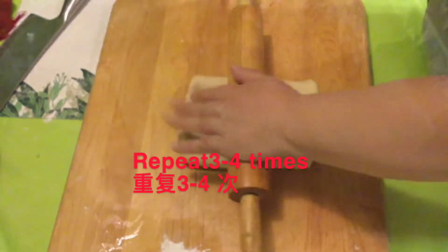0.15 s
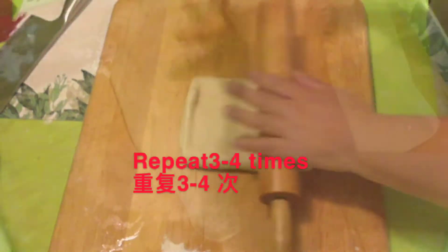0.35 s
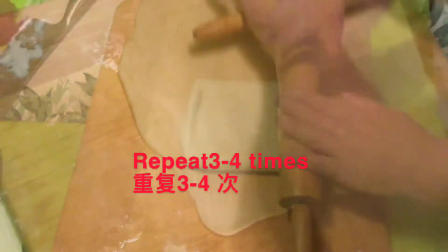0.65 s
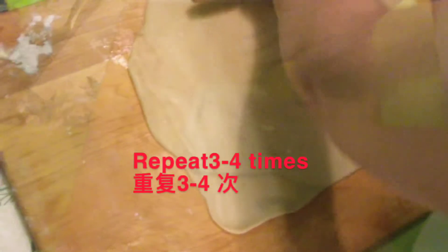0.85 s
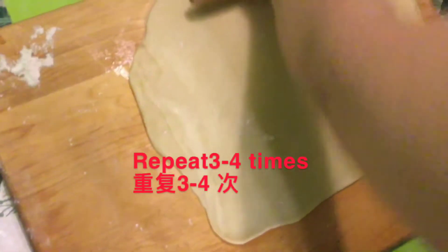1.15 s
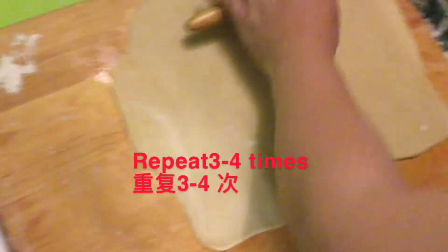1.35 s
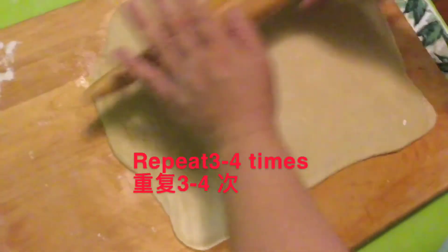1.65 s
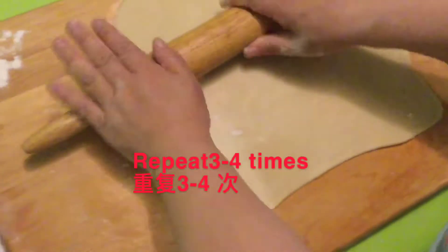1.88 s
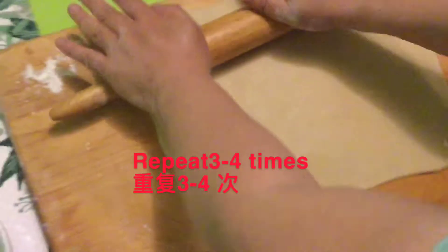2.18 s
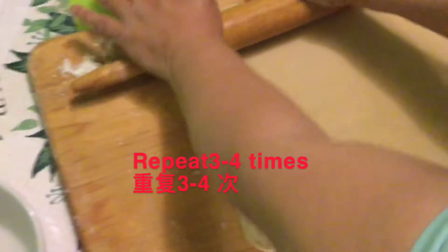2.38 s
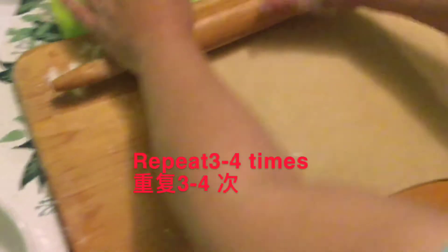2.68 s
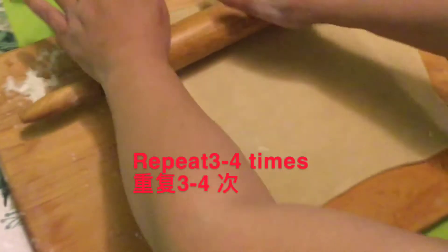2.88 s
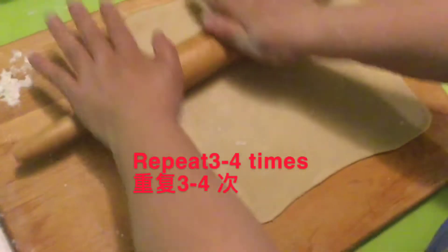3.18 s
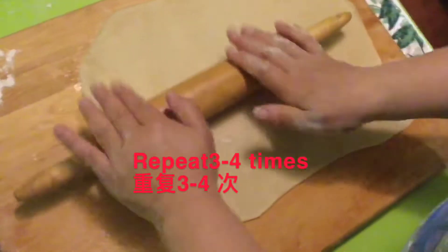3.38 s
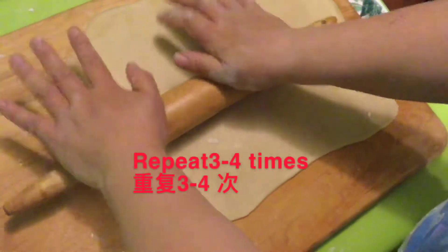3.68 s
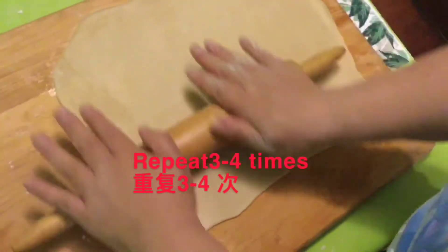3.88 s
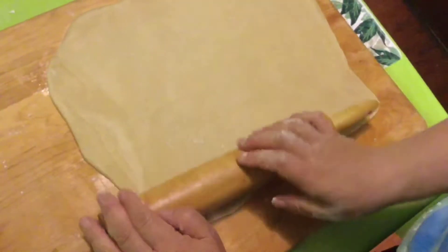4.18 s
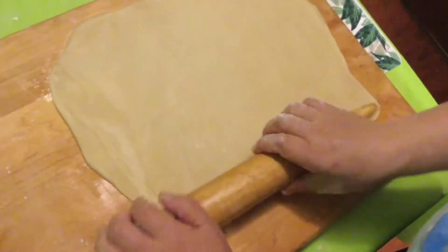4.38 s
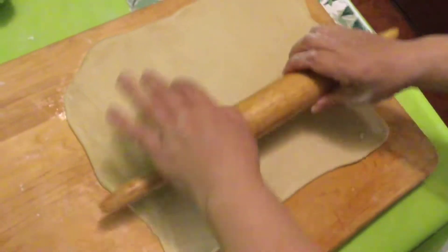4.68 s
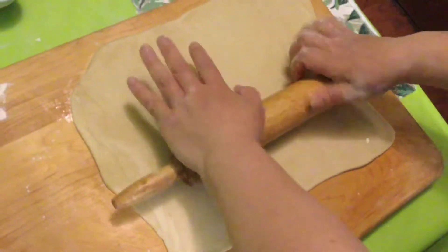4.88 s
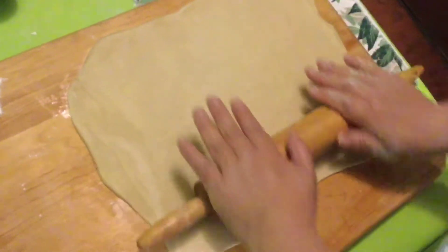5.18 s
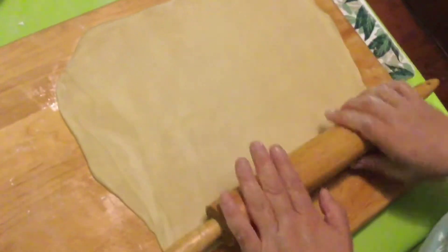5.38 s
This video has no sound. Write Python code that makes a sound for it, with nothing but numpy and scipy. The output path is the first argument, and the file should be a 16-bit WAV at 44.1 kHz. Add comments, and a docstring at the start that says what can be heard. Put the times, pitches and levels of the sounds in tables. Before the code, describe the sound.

Close in a quiet kitchen, a wooden rolling pin works dough on a board. Faint scuffs lead to a sharp ringing clack, then quiet brushing. A heavier clattering cluster with a low thud comes near two seconds, followed by soft rubbing and light taps. Another quick run of bright clacks arrives near five seconds, and a louder palm swish closes it. Small microphone, mono, little deep bass.

```python
"""Quiet kitchen: a wooden rolling pin works a sheet of dough on a wooden board, heard close by.
Knocks and scuffs: noisy contact forces drive the wood's modes; the pin rings near 2, 4 and 5.5 kHz.
Thuds: short sines at board notes. Palms: shaped noise hisses over floured wood and rubs the pin's modes.
Rolling: low noise in the board. Room: faint, mostly low noise."""
import sys
import numpy as np
from scipy import signal
from scipy.fft import rfft, irfft, next_fast_len
from scipy.io import wavfile
from scipy.ndimage import uniform_filter1d, map_coordinates

SR = 44100
rng = np.random.default_rng(int(sys.argv[2]) if len(sys.argv) > 2 else 0)


def store_wav(level_fs):
    """Save 16-bit WAV to argv[1]."""
    pcm = np.round(np.clip(np.atleast_2d(level_fs), -1, 1) * 32767)
    wavfile.write(sys.argv[1], SR, pcm.T.astype(np.int16))


N = 244314  # samples

# Room and microphone noise: (frequency [Hz], relative density [dB per Hz])
ROOM_SPECTRUM = [(15, -37), (25, -13.5), (113, -9.5), (165, -10.5), (205, -14.5), (341, -23), (391, -23),
                 (435, -6.5), (570, -19.5), (1590, -17), (1920, -20.5), (2190, -20.5), (15700, -32)]
# Board under the rolling pin: (frequency [Hz], relative density [dB per Hz])
ROLL_SPECTRUM = [(15, -57), (25, -27), (60, 1), (178, -5.5), (350, -5.5), (395, -7.5), (445, -12.5),
                 (900, -20), (1170, -37.5), (1980, -120)]
# Rolling pin, before its random unevenness: (time [s], level [dB])
ROLL_LEVELS = [(0.0, -71.5), (0.52, -74.5), (0.65, -67.5), (1.0, -72.5), (1.251, -70), (1.73, -71),
               (2.02, -71), (2.42, -70), (3.19, -71.5), (3.32, -69), (3.53, -68.5), (3.72, -70.5),
               (3.92, -69), (4.2, -68), (4.81, -70), (4.94, -65.5), (5.14, -71.5), (5.54, -66.5)]
# Palm on floured wood: (frequency [Hz], relative density [dB per Hz])
PALM_SPECTRUM = [(1500, -59.5), (3300, -11.5), (3950, 0), (5200, -2), (6300, -6.5), (9000, -4), (15700, -4)]
# Hands resting on the turning pin, hiss before roughness: (time [s], level [dB])
REST_HISS_LEVELS = [(0, -83), (.35, -78.5), (.53, -83), (.83, -77.5), (.97, -80.5), (1.13, -76.5),
                    (1.2, -94), (1.6, -77), (1.8, -84), (2.1, -73), (2.52, -75.5), (2.63, -80.5),
                    (2.92, -74), (3, -86), (3.3, -72.5), (3.5, -71), (3.62, -80.5), (4, -70), (4.36, -71),
                    (4.59, -81.5), (5.16, -75), (5.54, -76.5)]
# Palms sliding over the pin, before roughness:
# (time [s], hold [s], hiss level [dB], rubbed pin level [dB])
SLIDES = [(0.203, 0.014, -69.5, -90), (0.287, .02, -71, -90), (0.425, .012, -73.5, -92),
          (1.227, 0.084, -75, -87), (1.412, .012, -73, -82), (1.418, 0.0062, -66, -78),
          (1.488, 0.045, -75, -78), (2.155, 0.029, -67, -78), (2.71, 0.057, -64, -79),
          (3.096, .012, -79.5, -88), (3.247, 0.031, -70.5, -94), (3.507, 0.022, -77.5, -79),
          (3.738, 0.014, -77, -82), (3.892, 0.12, -72, -71), (4.186, 0.017, -76.5, -70),
          (4.29, 0.034, -69.5, -92), (4.408, 0.01, -65, -84), (4.515, 0.013, -73.5, -74.5),
          (4.647, 0.06, -75.5, -84), (5.032, .015, -70, -88), (5.411, 0.069, -54.5, -69)]
# Soft bumps sounding one board note: (time [s], frequency [Hz], level [dB], hold [s])
THUDS = [(1.006, 261.6, -52.5, 0.018), (1.95, 315, -34.5, 0.0082), (3.757, 410, -51, 0.0092)]
# Modes of board and pin, ringing freely: (frequency [Hz], relative level [dB], t60 [s])
WOOD_MODES = [(73, -6, 0.21), (116.7, 4.5, 0.16), (162.3, -2.5, 0.11), (219.3, -2, 0.17), (265, -8.5, 0.12),
              (308.7, 0, 0.073), (390, -12.5, 0.22), (411, -24.5, 0.12), (789, -4, 0.022),
              (1024, -0.5, 0.019), (1346, -2.5, 0.044), (1510, -13, 0.14), (1670, -0.5, 0.034),
              (1840, -2.5, 0.074), (1934, -14.5, 0.63), (1951, 9, 0.065), (2207, -13, 0.23),
              (2410, 2.5, 0.056), (2980, -5.5, 0.071), (3505, -18.5, 0.23), (3916, -5, 0.015),
              (4000, 0.5, 0.033), (4386, -5.5, 0.1), (5140, -12, 0.11), (5487, 2.5, 0.14),
              (6280, -1.5, 0.064), (6990, -1, 0.08), (8500, 3, 0.097), (9000, -18, 0.037)]
# Spread of a contact over the wood: (zone centre [Hz], level against its part's column [dB])
ZONES = [(104, -1.5), (190, -2.1), (391, -1.86), (1080, 0.8), (1988, -1.1), (2450, -1.4), (3110, -4.5),
         (3950, -3.3), (4430, -4.5), (5500, -6.5), (8000, -14.5), (11500, -20)]
# Part driving each zone: (index into the six parts of KNOCKS [0-5])
ZONE_PART = [0, 0, 1, 1, 2, 3, 3, 4, 5, 5, 5, 5]
# Blows of the pin on the board: (time [s], peak levels before zone offsets [dB] of board thump,
# board tap, pin ring, handles, first pin overtones, upper pin overtones;
# share of free ring time the hands allow [0-1])
KNOCKS = [(0.4778, -80, -74, -67, -72, -86, -83, .6),
          (0.5682, -36.5, -44.5, -24.5, -33.5, -29.5, -28, 0.51), (0.6135, -45, -49, -38, -52, -63, -60, 1),
          (0.7567, -70, -66, -41, -63, -59, -57, .4), (0.763, -75, -59.5, -50, -61.5, -66, -59.5, 0.48),
          (1.9164, -66, -46, -42, -54.5, -45, -57, 0.6), (1.9499, -28, -37.5, -68, -64, -44, -46, 1),
          (1.957, -34, -45, -39, -40.5, -29.5, -47, 0.38), (1.9692, -39, -41, -22.5, -42.5, -22, -36, 0.43),
          (1.9834, -33.5, -39, -46, -46, -58, -42, 0.51), (2.007, -48, -50, -48, -63, -70, -63, 0.98),
          (2.0445, -48.5, -58, -49, -74, -73, -69, 0.68), (3.1118, -62, -43.5, -45.5, -64, -59, -66, 0.68),
          (3.124, -61, -44.5, -53, -64, -55, -77, 0.63), (3.918, -75, -48.5, -51, -72, -58, -70.5, 1),
          (4.4012, -57, -44, -47, -46.5, -55, -65, 1), (4.4068, -50.5, -49.5, -33.5, -50, -58, -53.5, 0.21),
          (4.8209, -35.5, -49.5, -31, -31.5, -58, -39, 0.87),
          (4.8306, -52.5, -50, -24.5, -34.5, -41, -44.5, 0.85), (4.892, -62, -62, -47, -69, -53, -50.5, 1),
          (4.92, -48, -61, -40, -46, -44, -44, 0.24), (4.9335, -72, -47, -28, -33, -36.5, -40.5, 0.63),
          (4.9429, -52, -47, -25.5, -60, -53, -37.5, 0.58), (4.9559, -51, -42.5, -30, -68, -61, -70, 0.85),
          (5.014, -59, -57.5, -51, -79, -74, -71, 0.46)]
# Soft scuffs of pin and hands on dough and board: (time [s], peak levels before zone offsets [dB] of
# board thump, board tap, pin ring, handles, first pin overtones; share of free ring time [0-1])
SCUFFS = [(0.2116, -60, -59, -48, -64, -78, 0.09), (0.2339, -75, -65, -56, -72, -81, 0.2),
          (0.4223, -93, -66, -69, -87, -87, 0.59), (0.8949, -93, -67, -64, -66, -64.5, .55),
          (0.925, -95, -62.5, -66, -69, -66, 0.74), (1.004, -77, -59, -75, -76, -72, .5),
          (1.281, -76, -93, -65.5, -76, -64, 1), (1.3104, -69, -95, -74, -79, -67, 0.62),
          (1.4029, -50, -68.5, -59, -80, -57, .71), (1.4293, -52.5, -77, -83, -78, -73, .31),
          (1.518, -77, -63, -86, -68, -73, 0.62), (1.888, -68, -62, -64, -72, -60, 0.34),
          (2.1336, -52.5, -68, -71, -80, -83, 0.16), (2.6388, -74, -68.5, -94, -95, -69, 0.65),
          (2.7719, -69, -83, -65.5, -91, -55, .61), (2.9116, -70, -57, -64.5, -67.5, -67, 1),
          (2.9385, -81, -58.5, -66, -75, -75, 0.67), (3.0847, -61, -67, -67, -72, -58, 0.58),
          (3.1612, -58.5, -57, -71, -85, -83, 0.41), (3.7204, -61, -72, -87, -76, -69, 0.98),
          (3.9293, -71, -58.5, -64, -77, -76, 0.96), (4.271, -70, -71, -63.5, -76, -83, 0.91)]

ROOM_DB = -74
SLIDE_RISE_DB_PER_S, SLIDE_FALL_DB_PER_S = 344, 218
REST_RUB_DB = -8  # resting hands: rubbed pin against hiss
# flour crushed by a blow: level = offset + slope * upper overtone level
PUFF_OFFSET_DB, PUFF_SLOPE_DB_PER_DB, PUFF_T60_S = -38, 0.56, 0.28
# rubbed pin tilt: (frequency [Hz], gain [dB])
RUB_TILT = [(1200, -45.0), (1900, -10.5), (3000, -12.0), (4100, -3.5), (5500, -10.5), (9000, -30)]
THUD_RISE_S, THUD_T60_S = 0.0011, 0.059
KNOCK_CONTACT_S, SCUFF_CONTACT_S = 0.0015, 0.0088  # landing to peak of the mean push
SCUFF_UPPER_DB = -3.5  # upper overtones against first
GRAZE_DB, GRAZE_S = -24.5, 0.0043
WALLS_DB, WALLS_T60_S, WALLS_RISE_S = -9.5, 0.27, 0.003
CRACK_DB, CRACK_CORNER_HZ = -50.5, 1500
BASS_HZ, TOP_HZ = 45, 15800


def amp(db):
    """dB to amplitude ratio."""
    return 10 ** (np.asarray(db) / 20)


def unit(x):
    """x scaled to rms 1."""
    return x / np.sqrt(np.mean(x ** 2) + 1e-20)


def along(points, hz):
    """Interpolate (frequency [Hz], value) points on a log frequency axis."""
    point_hz, value = np.transpose(points)
    return np.interp(np.log(hz + 1), np.log(point_hz + 1), value)


def wobble(knots_per_s):
    """Smooth random curve through normal knots."""
    knots = rng.standard_normal(int(N * knots_per_s / SR) + 4)
    return map_coordinates(knots, [np.arange(N) * knots_per_s / SR])


def filtered(x, response):
    """Apply a complex response of frequency to x."""
    m = next_fast_len(N + SR // 2)
    hz = np.fft.rfftfreq(m, 1 / SR)
    return irfft(rfft(x, m) * response(hz), m)[..., :N]


def rush(spectrum, patchy_db):
    """Noise of rms 1: random gain patches in time and frequency, then spectral shaping."""
    z = signal.stft(rng.standard_normal(N + 512), nperseg=512)[2]
    patches = uniform_filter1d(rng.standard_normal(z.shape), size=6, axis=0)
    patches = uniform_filter1d(patches, size=10, axis=1)
    x = signal.istft(z * amp(patchy_db * unit(patches)), nperseg=512)[1][:N]
    return unit(filtered(x, lambda hz: amp(along(spectrum, hz))))


def modes(hz, free=1, scatter_db=0):
    """Causal resonances of the wood; hands scale every ring time by the share free."""
    mode_hz, db, t60_s = np.transpose(WOOD_MODES)[:, :, None]
    width_hz = np.log(1000) / (np.pi * t60_s * free)
    size = amp(db + scatter_db * rng.standard_normal(mode_hz.shape))
    resonances = size * 1j * hz / (mode_hz ** 2 - hz ** 2 + 1j * hz * width_hz)
    return np.sum(resonances, axis=0)


def room():
    """Steady room and microphone noise."""
    return amp(ROOM_DB) * rush(ROOM_SPECTRUM, patchy_db=1.25)


def rolling():
    """The rolling pin shakes the board: low noise of uneven level."""
    level_db = np.interp(np.arange(N) / SR, *np.transpose(ROLL_LEVELS))
    return amp(level_db - 0.04 + 2.55 * wobble(18)) * rush(ROLL_SPECTRUM, patchy_db=3.5)


def hand_gains():
    """Hiss and rub gains: resting hands and slides add in power; each blow puffs flour into the hiss."""
    now = np.arange(N) / SR
    hiss = amp(np.interp(now, *np.transpose(REST_HISS_LEVELS)))
    rub = hiss * amp(REST_RUB_DB)
    for s, hold_s, hiss_db, rub_db in SLIDES:
        rise_db = -SLIDE_RISE_DB_PER_S * np.maximum(s - now, 0)
        fall_db = -SLIDE_FALL_DB_PER_S * np.maximum(now - s - hold_s, 0)
        shape = amp(rise_db + fall_db)
        hiss = np.hypot(hiss, amp(hiss_db) * shape)
        rub = np.hypot(rub, amp(rub_db) * shape)
    for s, *_, upper_db, _free in KNOCKS:
        puff_db = PUFF_SLOPE_DB_PER_DB * upper_db + PUFF_OFFSET_DB
        decay_db = -60 * np.abs(now - s) / PUFF_T60_S
        hiss = np.hypot(hiss, amp(puff_db + decay_db) * (now >= s))
    return hiss, rub


def palm_hiss(gain, grip_db):
    """Skin slides over floured wood: bright noise, roughened by grip and single grains."""
    grains_db = 0.76 * wobble(300)
    return gain * amp(2.0 + grip_db + grains_db) * rush(PALM_SPECTRUM, patchy_db=2.8)


def pin_rub(gain, grip_db):
    """Gritty rubbing excites the pin's modes, heavily damped by the hands."""
    grit = rng.standard_normal(N) * amp(1.5 * wobble(82))
    rubbed = filtered(grit, lambda hz: modes(hz, free=0.12) * amp(along(RUB_TILT, hz)))
    return gain * amp(grip_db) * unit(rubbed)


def palms():
    """Hiss and rub share one grip as the skin sticks and slips."""
    hiss_gain, rub_gain = hand_gains()
    grip_db = 0.8 * wobble(40)
    return palm_hiss(hiss_gain, grip_db) + pin_rub(rub_gain, grip_db)


def thuds():
    """A dull board note rises, holds briefly, then dies."""
    out, t = np.zeros(N), np.arange(SR // 4) / SR
    for s, hz, db, hold_s in THUDS:
        rise = 1 - np.exp(-t / THUD_RISE_S)
        fall = amp(db - 60 * np.maximum(t - hold_s, 0) / THUD_T60_S)
        out[round(s * SR):][:len(t)] += rise * fall * np.sin(2 * np.pi * hz * t)
    return out


def contact_force(t, contact_s):
    """Uneven push from landing at t = 0, after a graze of the dough, plus the room's answer."""
    push_noise, wall_noise = rng.standard_normal((2, len(t)))
    after = np.maximum(t, 0)
    u = after / contact_s
    graze = amp(GRAZE_DB) * np.exp(t / GRAZE_S) * (t < 0)
    push = (push_noise + 0.94) * (graze + u * np.exp(-u))
    # walls answer after a few ms
    walls = wall_noise * amp(-60 * after / WALLS_T60_S) * (1 - np.exp(-after / WALLS_RISE_S))
    return unit(push) + amp(WALLS_DB) * unit(walls)


def knocks():
    """Blows and scuffs: each contact force drives the wood's modes, levelled zone by zone."""
    size, lead = 3 * 2 ** 12, 2 ** 10  # samples per contact, before landing
    out = np.zeros(N + size)
    t, hz = (np.arange(size) - lead) / SR, np.fft.rfftfreq(size, 1 / SR)
    zone_hz, zone_db = np.transpose(ZONES)
    # overlapping triangular bands
    zones = np.array([along(np.c_[zone_hz, one], hz) for one in np.eye(len(ZONES))])
    crack = amp(CRACK_DB) * hz / (hz + CRACK_CORNER_HZ)  # bright part no mode holds
    scuffs = [(*row, first_db, first_db + SCUFF_UPPER_DB, free) for *row, first_db, free in SCUFFS]
    for contact_s, table in (KNOCK_CONTACT_S, KNOCKS), (SCUFF_CONTACT_S, scuffs):
        for s, *part_db, free in table:
            force = contact_force(t, contact_s)
            body = modes(hz, free, scatter_db=2)
            parts = irfft(rfft(force) * (body + crack) * zones, size)
            peak = np.abs(parts).max(axis=1, keepdims=True)
            parts *= amp(np.take(part_db, ZONE_PART) + zone_db)[:, None] / peak
            out[round(s * SR) - lead:][:size] += parts.sum(axis=0)
    return out[:N]


def scene():
    """Room, rolling, palms, thuds and knocks, one channel."""
    return (room() + rolling() + palms() + thuds() + knocks())[None]


def record(dry):
    """Small microphone: second-order loss of deep bass, nothing above the band limit."""
    return filtered(dry, lambda hz: (1j * hz / (BASS_HZ + 1j * hz)) ** 2 * (hz < TOP_HZ))


dry = scene()
out = record(dry)
store_wav(out)
```